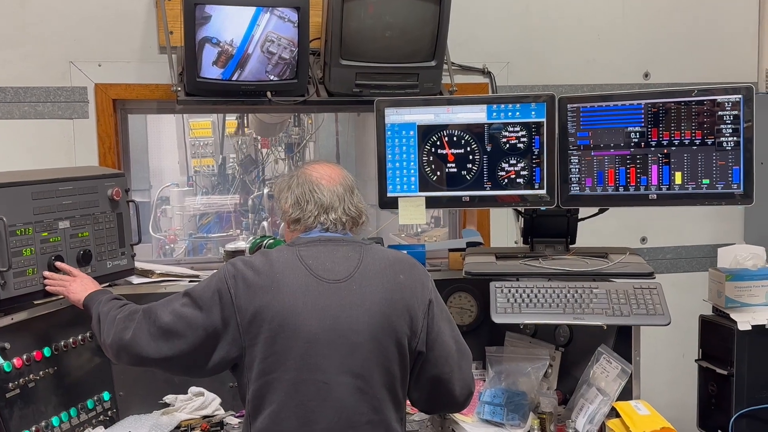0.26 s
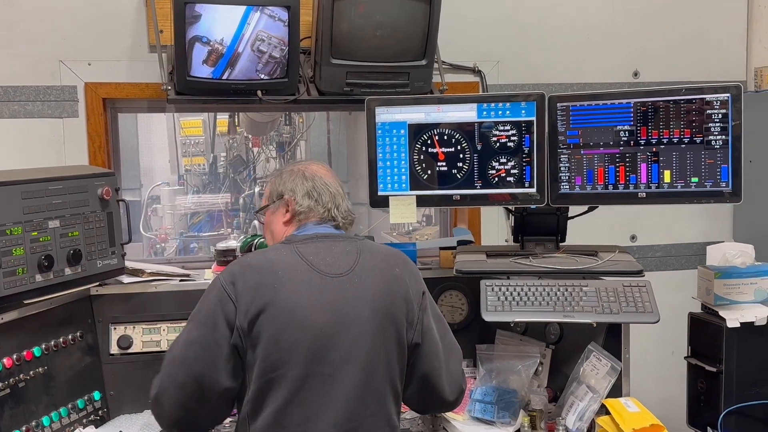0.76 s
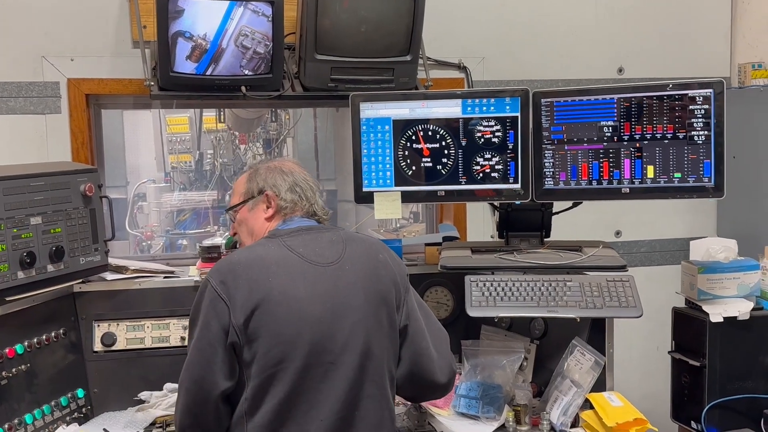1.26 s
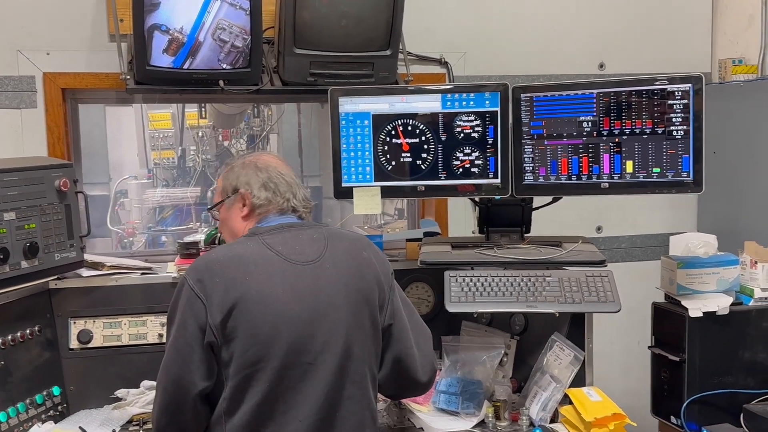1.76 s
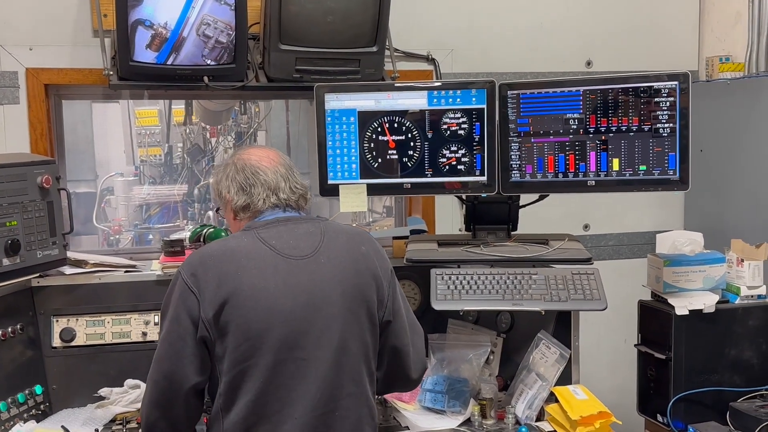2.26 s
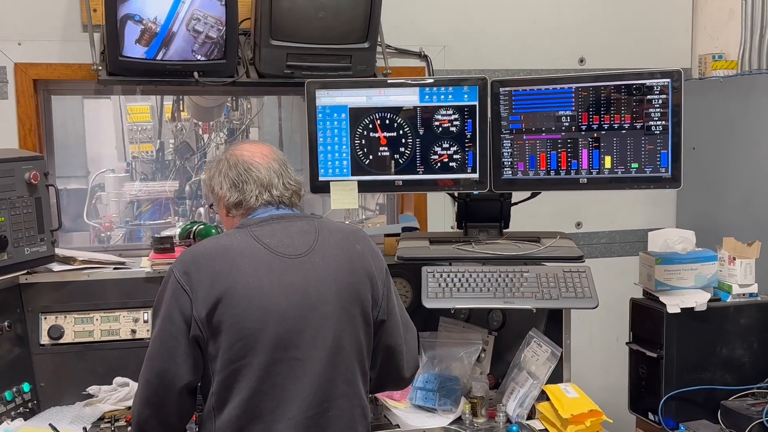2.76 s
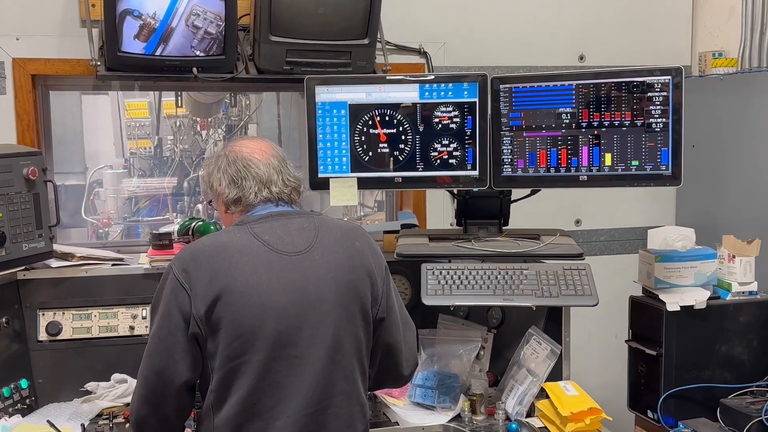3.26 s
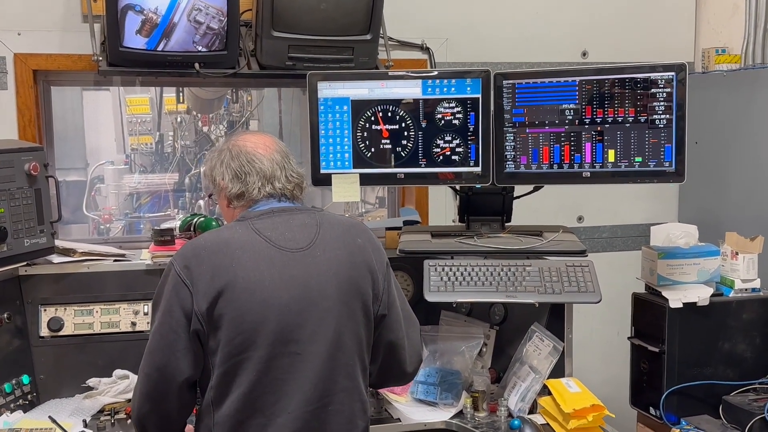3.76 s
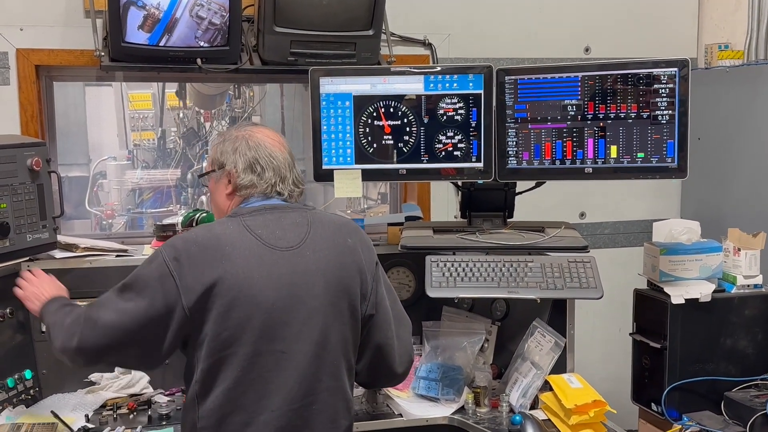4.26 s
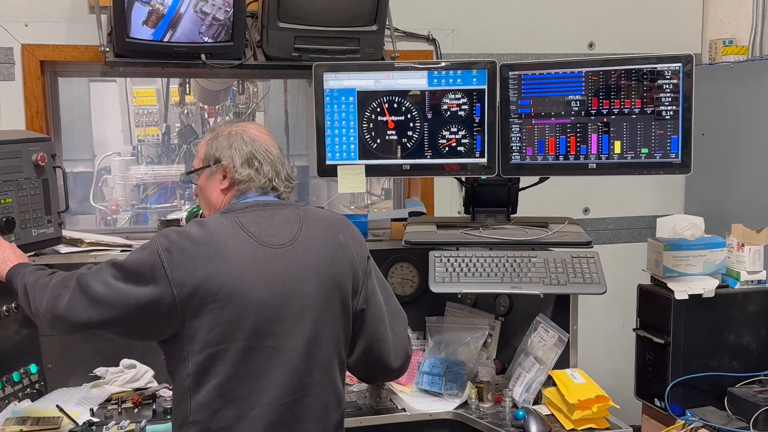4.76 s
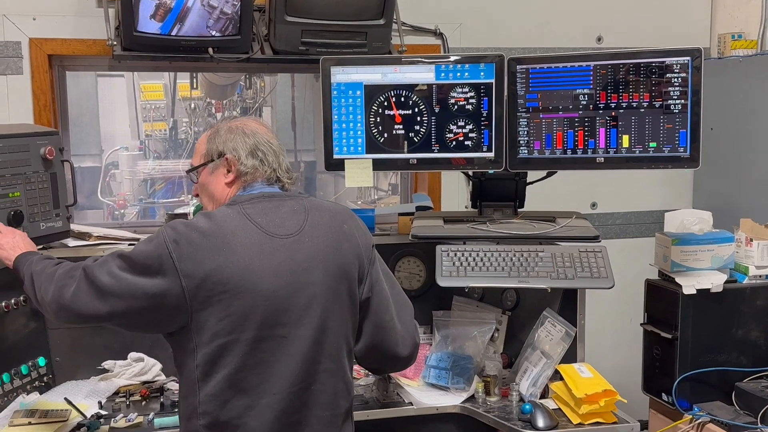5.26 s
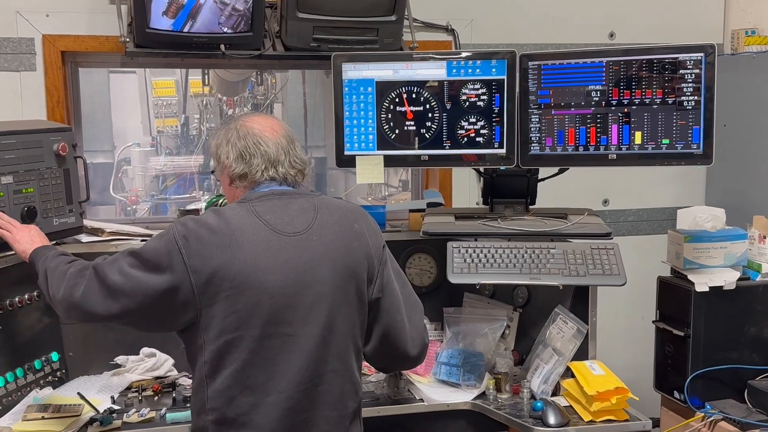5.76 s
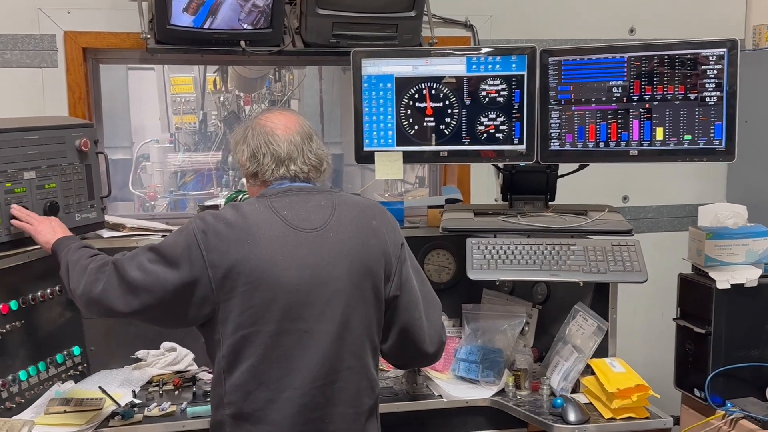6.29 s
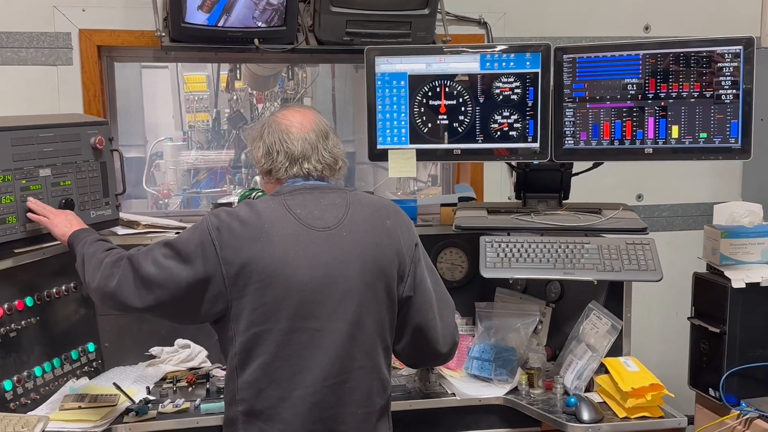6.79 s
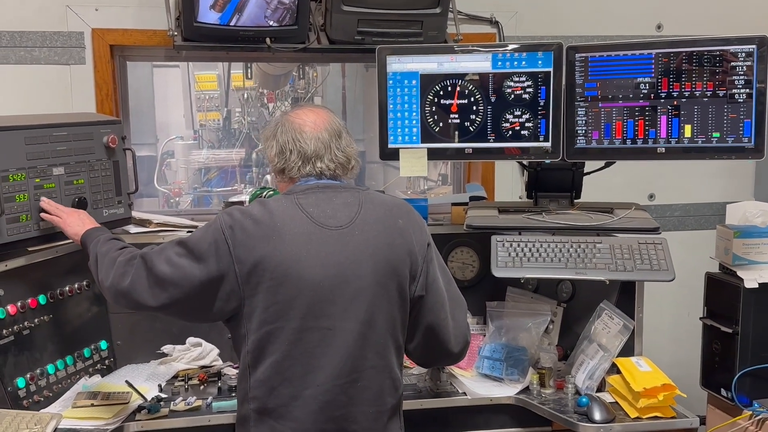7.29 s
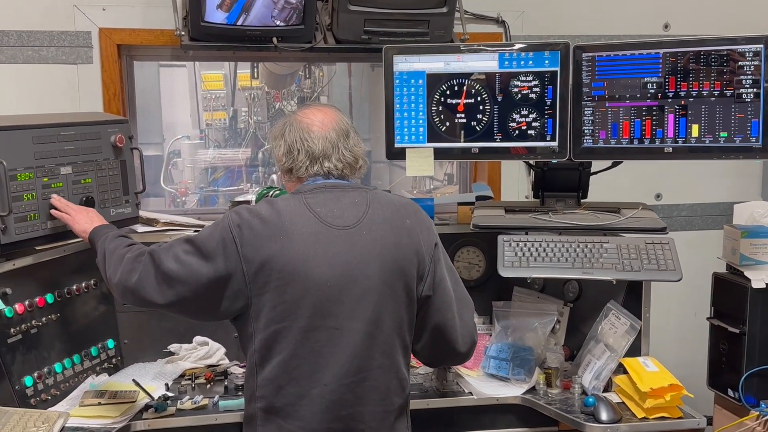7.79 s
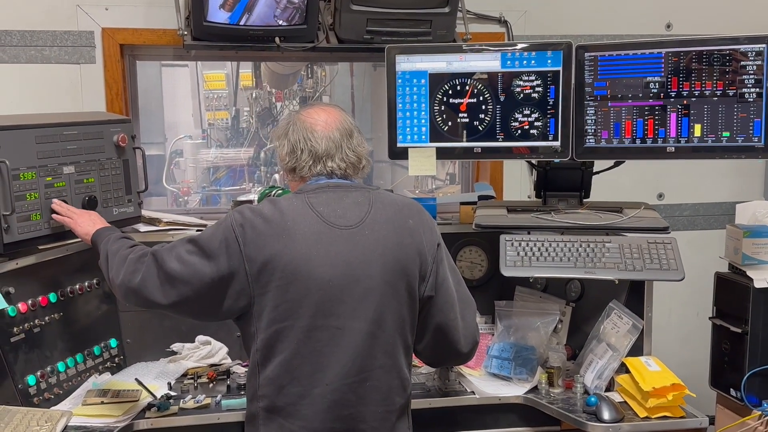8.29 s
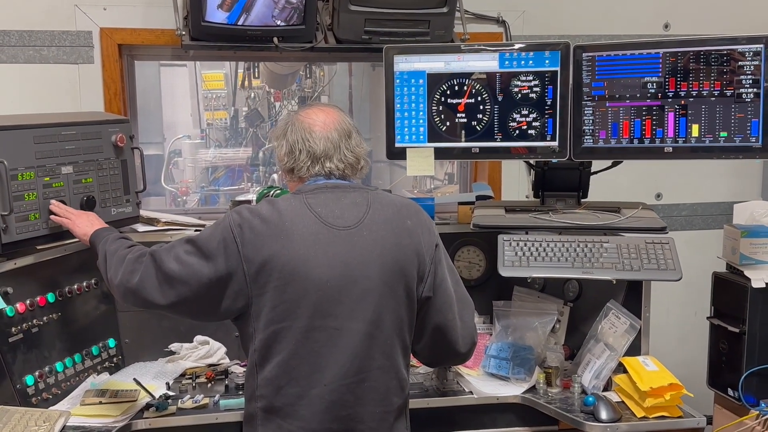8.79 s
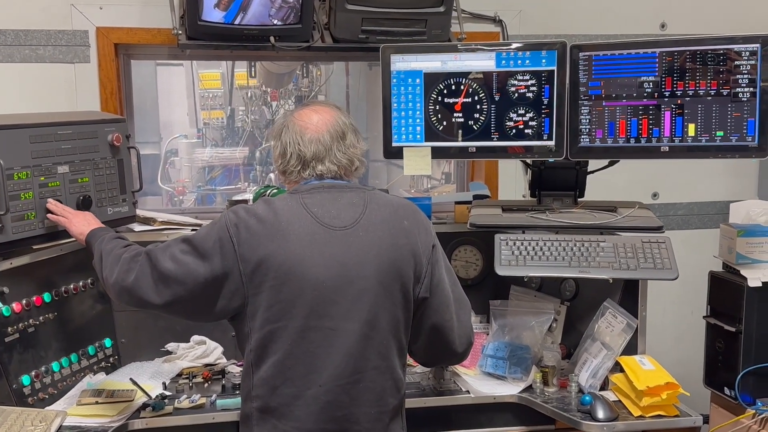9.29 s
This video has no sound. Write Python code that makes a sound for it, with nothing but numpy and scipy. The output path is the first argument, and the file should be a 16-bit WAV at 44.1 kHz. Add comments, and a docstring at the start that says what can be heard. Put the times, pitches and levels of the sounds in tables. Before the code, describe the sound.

Muffled test-bench engine holds a low, strong hum over rushing ventilation, a tiny clink near two seconds, then it rises and settles higher.

```python
"""Engine on a test bench

A four-cylinder engine, heard through a window from the control room, holds its speed, climbs and holds again.
Exhaust notes are sines that swell and dip as they cross standing waves; knocks are pulses with echoes.
Weak tones, a crank beat and a gear whine follow the engine; fans are shaped noise and steady sines.
A low shudder is narrow noise, and something small clinks once: short rings and a dying hiss."""
import sys
import numpy as np
from scipy import signal
from scipy.fft import rfft, irfft, next_fast_len
from scipy.io import wavfile

SR = 44100
rng = np.random.default_rng(int(sys.argv[2]) if len(sys.argv) > 2 else 0)


def linear_from_db(decibels):
    """Turn decibels (scalar or array-like) into linear amplitude factors; 0 gives 1."""
    return 10 ** (np.asarray(decibels, float) / 20)


def dump(signal):
    """Clip the signal to [-1, 1] and save it as 16-bit WAV at the path in sys.argv[1]."""
    limited = np.clip(np.atleast_2d(signal).T, -1, 1)
    pcm = np.round(limited * 32767).astype(np.int16)
    wavfile.write(sys.argv[1], SR, pcm)


N = 420707
TIME = np.arange(N) / SR
FFT_SIZE = next_fast_len(N + SR)   # a second of room for echoes
HZ = np.fft.rfftfreq(FFT_SIZE, 1 / SR)
LEFT_RIGHT = np.array([[1], [-1]])   # opposite signs on the two sides

# how alike roar and echoes are on the two sides: f/Hz, likeness (0-1)
LIKENESS = [(60, .998), (120, .95), (350, .78), (600, .68), (800, .4), (1300, .5), (1800, .82), (2100, .95),
            (4500, .96), (5200, .995), (10500, .995), (11000, .999), (16000, .999)]


def in_time(rows):
    """Reads the columns of a curve, time first, at every sample."""
    times, *columns = np.transpose(rows)
    return [np.interp(TIME, times, column) for column in columns]


def at_hz(points):
    """Reads a table over frequency at every frequency bin, on a logarithmic pitch scale."""
    hz, values = np.array(points).T
    return np.interp(np.log(HZ + 1), np.log(hz), values)


def peak_db(hz, width, db):
    """A resonance as a bump in dB."""
    return db / (1 + (2 * (HZ - hz) / width) ** 2)


def shaped(x, gain):
    """Filters a sound by a gain for each frequency bin."""
    size = 2 * (len(HZ) - 1)
    return irfft(rfft(x, size) * gain, size)[..., :N]


def drift(rate):
    """Slow random wandering of spread 1, changing about rate times a second."""
    pole = np.exp(-400 * np.pi * rate / SR)   # one point every 200 samples
    noise = rng.standard_normal(N // 200 + 1002)
    slow = signal.lfilter([1], [1, -2 * pole, pole * pole], noise)[1000:]   # skip the start-up
    return np.interp(np.arange(N) / 200, np.arange(len(slow)), slow / slow.std())


def panned(x, left_right_db):
    """Places one signal between the two sides by their level difference."""
    return x * linear_from_db(np.array([left_right_db / 2, -left_right_db / 2]).reshape(2, -1))


def tone(cycles, db):
    """A sine of the given rms level, starting at a random phase."""
    return np.sqrt(2) * linear_from_db(db) * np.sin(2 * np.pi * (cycles + rng.random()))


def shared_and_opposite():
    """Gains for noise equal on both sides and noise opposite on them, so that the sides are partly alike."""
    alike = np.clip(at_hz(LIKENESS), 0, 1)
    return np.sqrt(1 + alike), np.sqrt(1 - alike)


def roar(bright_db):
    """Fans and air: smooth stereo noise coloured by ducts; its treble flickers and follows speed and load."""
    # noise of fans and air before the ducts: f/Hz, level/dB per Hz
    air = [(25, -71), (40, -66), (52, -53.5), (85, -59.5), (140, -55.5), (250, -57), (400, -58), (700, -60),
           (1200, -65), (1700, -68.5), (2400, -73.5), (3900, -79), (5000, -83.5), (7500, -84.5),
           (9500, -87), (11000, -96), (13500, -102), (14300, -100), (15600, -100)]
    # ducts, panels and faint whistles that colour it: f/Hz, width/Hz, lift/dB
    ducts = [(220, 20, 4), (262, 40, -3), (310, 30, 4), (1385, 25, 5), (5180, 20, 5), (7130, 20, 5),
             (8000, 60, 6), (8890, 50, 5), (10120, 25, 7), (10680, 25, 6), (13240, 30, 7)]
    mid, side = rng.standard_normal((2, N)) * np.sqrt(SR) / 2   # makes 0 dB per Hz on each side
    shared, opposite = shared_and_opposite()
    colour = linear_from_db(at_hz(air) + sum(peak_db(*duct) for duct in ducts))
    both = shaped(mid, colour * shared) + shaped(side, colour * opposite) * LEFT_RIGHT
    treble = shaped(both, 1 / (1 + (4500 / (HZ + 1)) ** 2))
    flicker_db = 0.45 * drift(9.8)
    return both + treble * (linear_from_db(bright_db + flicker_db) - 1)


def hum():
    """Fan tones: steady sines that waver slightly in pitch and level."""
    # fan tones: f/Hz, rms level/dB, waver/dB
    fan_tones = [(64.6, -45, 2), (107.6, -43, 2), (118.4, -33, .5), (129.2, -42, 2), (323.0, -35, .8)]
    return sum(tone(hz * TIME + 0.015 * drift(1.0), db + waver_db * drift(0.8))
               for hz, db, waver_db in fan_tones)


def shudder():
    """A low shudder of the building: noise in one narrow resonance, its level wavering very slightly."""
    centre_hz, width_hz = 51, 11
    level_db, waver_db = -40.5, 0.2
    ringing = shaped(rng.standard_normal(N), peak_db(centre_hz, width_hz, 1))   # here the bump is a plain gain
    return linear_from_db(level_db + waver_db * drift(1.5)) * ringing / ringing.std()


def clink():
    """A small hard thing struck once: a few short rings and a bright dying hiss."""
    # the strike: t/s, level/dB
    start, strike_db = (1.9785, -32)
    # its rings: f/Hz, level/dB against the strike, time to fall by 60 dB/s
    modes = [(5700, 2, 0.037), (9200, -8, .02), (14300, 2, .02)]
    # tone colour of its hiss: f/Hz, level/dB relative
    hiss_colour = [(4000, -30), (6500, -11), (9500, -6), (12500, -22), (13800, -14), (14300, 0),
                   (15700, -3)]
    hiss_db, hiss_t60_s = 4, 0.23
    age = np.maximum(TIME - start, 0)
    rings = sum(linear_from_db(db - 60 * np.minimum(age / t60, 5)) * np.sin(2 * np.pi * hz * age)
                for hz, db, t60 in modes)
    hiss = shaped(rng.standard_normal(N), linear_from_db(at_hz(hiss_colour) + hiss_db))
    fading_hiss = hiss * (age > 0) * linear_from_db(-60 * np.minimum(age / hiss_t60_s, 5))
    return linear_from_db(strike_db) * (rings + fading_hiss)


def crank_beat(firings, fast):
    """The crankshaft: a wavering sine at half the firing rate that grows with speed."""
    low_speed_db, high_speed_db, waver_db = -46, -34, 3
    db = low_speed_db + fast ** 2 * (high_speed_db - low_speed_db) + waver_db * drift(2.3)
    return tone(firings / 2, db)


def gear_whine(firings, fast, load_db):
    """Meshing gear teeth: two slightly rough sines locked to the engine that fade with speed."""
    # two meshes: teeth per firing, level/dB relative
    gears = [(26.0, 0), (26.4, -1)]
    low_speed_db, high_speed_db, waver_db = -58.5, -70, 1.2
    load_share = 0.35
    whine_db = low_speed_db + fast ** 2 * (high_speed_db - low_speed_db)
    whine_db = whine_db + load_share * load_db + waver_db * drift(2.4)
    return sum(tone(teeth * firings + 0.21 * drift(12.6), whine_db + db + 2.9 * drift(8.0))
               for teeth, db in gears)


def weak_orders(firings, speed, fast, load_db):
    """Weaker engine tones: they follow speed and load, swell on panels and waver in level and place."""
    # multiple of the firing rate, level/dB at low speed, level/dB at high speed, before load and panels
    orders = [(1.5, -62, -46), (2.75, -46.5, -50), (3.5, -54, -58), (5.0, -54.5, -57), (5.5, -63, -57),
              (6.0, -55, -54.5), (6.5, -62, -53.5), (7.0, -57, -58), (7.5, -55, -55.5), (9.0, -57, -54)]
    # panels that lift a tone as it passes their pitch: f/Hz, width/Hz, lift/dB
    panels = [(549, 23, 12), (910, 45, 11.5), (1128, 110, 7), (1275, 30, 5), (1376, 55, 11.5)]
    lift_db = sum(peak_db(*panel) for panel in panels)
    out = 0
    for multiple, low_db, high_db in orders:
        wobble = 0.004 * multiple * drift(8.0)   # the shaft does not turn quite evenly
        speed_db = low_db + fast * (high_db - low_db)
        db = speed_db + load_db + np.interp(multiple * speed, HZ, lift_db)
        wavering = tone(multiple * firings + wobble, db + 2.5 * drift(2.5))
        out = out + panned(wavering, 3.8 * drift(2.1))
    return out


def cell_echoes():
    """The test cell: dying noise as its echoes, partly alike on the two sides, given as a spectrum."""
    t60_s = 0.74
    echoes = rng.standard_normal((2, SR)) * linear_from_db(-60 * TIME[:SR] / t60_s)
    echoes /= np.sqrt(np.sum(echoes ** 2, axis=1, keepdims=True))
    mid, side = rfft(echoes, 2 * (len(HZ) - 1))
    shared, opposite = shared_and_opposite()
    return (shared * mid + opposite * side * LEFT_RIGHT) / np.sqrt(2)


def knock(firings, speed, load_db):
    """Unequal cylinders: one pulse each crank turn, strong and weak in turn, smeared by echoes and a panel."""
    # the knock through the wall, before load: f/Hz, level/dB of each overtone
    through_wall = [(30, -75), (150, -57), (500, -50.5), (900, -57.5), (1300, -54), (1800, -63.5),
                    (2600, -70), (4000, -84), (7000, -115)]
    # a panel that rings along, before load: f/Hz, width/Hz, level/dB of an overtone on its peak
    pane_hz, pane_width, pane_db = (1385, 31.5, -44.5)
    weak_db = -9.5   # every second pulse is softer
    at = np.flatnonzero(np.diff(np.floor(firings / 2)))   # two firings make a crank turn
    strength_db = load_db[at] + weak_db * (np.arange(len(at)) % 2) + rng.normal(0, 2.3, len(at))
    pulses = np.zeros(N)
    pulses[at] = SR * np.sqrt(8) / speed[at] * linear_from_db(strength_db)   # overtones keep their level at any speed
    pane = linear_from_db(pane_db) / (1 + 2j * (HZ - pane_hz) / pane_width)
    return shaped(pulses, linear_from_db(at_hz(through_wall)) * cell_echoes() + pane)


def exhaust(firings, speed, load_db):
    """Clean notes locked to the firing; standing waves set each note's level and cancel between their pitches."""
    # standing waves of cell and control room, before load: f/Hz, width/Hz, rms level on the peak/dB, L-R/dB
    standing_waves = [(159.4, 1.8, -9.8, 0.1), (164.8, 1.8, -34.7, -10.1), (168.0, 4.1, -20.6, 2.8),
                      (177.2, 2.3, -34.5, -0.1), (180.8, 2.3, -46.7, 30.9), (188.4, 6.0, -22.6, -1.9),
                      (198.5, 2.1, -30.0, 3.1), (208.0, 11.9, -46.3, 35.0), (215.6, 1.3, -25.2, 12.9),
                      (321.8, 4.2, -52.2, 32.9), (333.3, 1.2, -49.4, 20.9), (339.5, 4.2, -24.8, 0.9),
                      (362.6, 4.8, -23.4, -1.4), (365.2, 2.6, -24.7, 8.9), (373.0, 3.2, -27.5, -0.6),
                      (385.6, 3.2, -28.9, 7.2), (396.4, 2.0, -39.4, -5.4), (401.4, 6.6, -36.5, 8.0),
                      (423.6, 2.7, -27.5, 3.9), (427.5, 1.8, -25.5, 0.7), (431.9, 1.2, -25.2, -0.8),
                      (475.7, 2.4, -39.0, -0.9), (499.9, 8.9, -45.2, 5.3), (523.5, 8.5, -42.3, 7.3),
                      (532.2, 2.0, -41.2, 10.4), (545.0, 5.5, -39.1, -9.8), (560.0, 1.2, -38.9, -2.7),
                      (570.7, 3.0, -50.3, 17.7), (601.1, 8.0, -44.7, 1.6), (617.9, 12.6, -33.8, -0.4),
                      (628.7, 1.3, -26.2, -2.5), (642.2, 1.6, -31.0, 6.4), (646.1, 1.2, -39.8, -15.7),
                      (718.6, 24.6, -45.8, 17.2), (822.6, 22.5, -37.7, 3.4)]
    # exhaust notes: multiple of the firing rate, level at the pipe/dB
    notes = [(1, 0), (2, 0), (3, 0), (4, -9)]
    near = HZ[HZ < 1000]
    waves = sum(panned(1 / (1 + 2j * (near - hz) / width), side_db) * linear_from_db(db)
                for hz, width, db, side_db in standing_waves)
    room = np.abs(waves)
    out = 0
    for multiple, db in notes:
        room_gain = [np.interp(multiple * speed, near, ear) for ear in room]
        out = out + tone(multiple * firings, db + load_db) * room_gain
    return out


def scene():
    """Runs the engine through its speeds and adds fans, shudder and clink around it."""
    # the engine hunts a little round its set speed, then is opened up: t/s, firing rate/Hz, load/dB
    engine = [(0.0, 157.21, -4.5), (0.35, 156.98, -5.5), (0.8, 157.78, -3.6), (1.1, 157.13, -4.0),
              (1.5, 157.07, -2.2), (1.85, 156.89, -5.9), (2.25, 157.03, -2.1), (2.6, 157.2, -4.8),
              (3.1, 157.38, -2.6), (3.7, 157.49, -1.2), (4.05, 157.4, -2.2), (4.25, 157.46, -1.1),
              (4.42, 157.08, -2.6), (4.6, 157.67, -1.2), (4.9, 157.24, -4.0), (5.05, 157.3, -2.1),
              (5.3, 156.99, -1.7), (5.45, 159.22, -3.8), (5.6, 161.18, 2.5), (5.75, 165.53, 5.0),
              (5.9, 168.39, 4.7), (6.03, 172.73, 6.5), (6.15, 177.19, 8.5), (6.3, 179.8, 5.7),
              (6.5, 182.22, 4.5), (6.7, 185.51, 9.0), (6.9, 189.34, 5.6), (7.1, 193.16, 4.2),
              (7.25, 197.49, 8.2), (7.6, 201.41, 4.7), (7.95, 206.64, 0.2), (8.07, 210.08, -5.0),
              (8.2, 213.39, 1.7), (8.35, 214.19, -1.5), (8.5, 215.29, -8.0), (8.68, 214.78, -3.3),
              (8.9, 214.03, -0.1), (9.2, 213.51, 2.3), (9.54, 213.79, 0.8)]
    # left-right balance of all but the exhaust: f/Hz, L-R/dB
    balance = [(60, -0.5), (200, 0.5), (400, 1.2), (600, 0.3), (800, 0.5), (1650, 3), (2200, -0.5),
               (5000, 1.5)]
    speed, load_db = in_time(engine)
    firings = np.cumsum(speed) / SR
    low_hz, high_hz = 157, 214
    fast = np.clip((speed - low_hz) / (high_hz - low_hz), 0, 1)   # 0 at low speed, 1 at high speed
    knock_db = -0.5 + 0.42 * load_db   # knock and weak tones follow a share of the load
    bright_db = 0.5 + fast * (1.5 - 0.5) + 0.12 * load_db   # extra treble in the roar
    around = roar(bright_db) + hum() + shudder() + clink()
    around = around + crank_beat(firings, fast) + gear_whine(firings, fast, load_db)
    around = around + weak_orders(firings, speed, fast, knock_db) + knock(firings, speed, knock_db)
    sideways = linear_from_db(at_hz(balance) / 2 * LEFT_RIGHT)
    return shaped(around, sideways) + exhaust(firings, speed, load_db)


def low_pass(x):
    """Removes everything above the highest recorded frequency."""
    return signal.sosfilt(signal.butter(12, 15700, fs=SR, output="sos"), x)


def record(dry):
    """A stereo widener turns the phase of the two sides against each other, differently at each frequency."""
    # phase by which the left side leads: f/Hz, phase/radians
    lead = [(20, 0), (100, 0), (125, .25), (150, .5), (500, .6), (850, 1.0), (1380, .4), (1720, -.1),
            (2200, .2), (3000, .6), (4570, .5), (5250, .05), (6400, .05), (7240, 1.1), (7600, 2.0),
            (7950, 3.1), (8600, 3.14), (8800, 2.4), (9220, 1.5), (10500, .8), (11000, .05), (13700, -.05),
            (14000, -.9), (14800, -1.7), (15700, -2.9)]
    turned = shaped(dry, np.exp(0.5j * at_hz(lead) * LEFT_RIGHT))   # half on each side
    return low_pass(turned)


dry = scene()
out = record(dry)
dump(out)
```